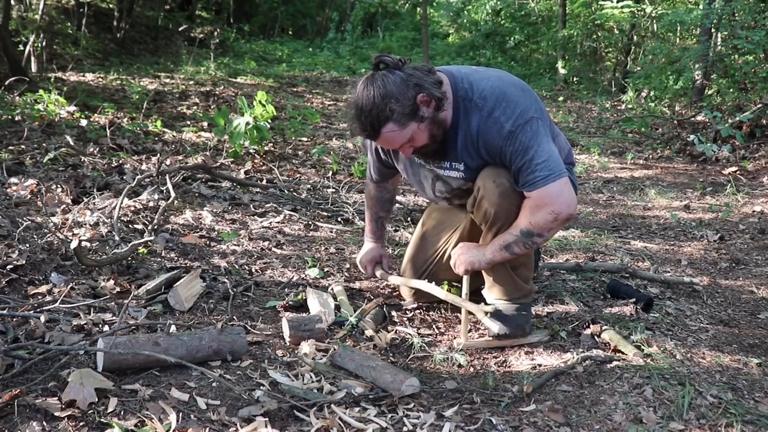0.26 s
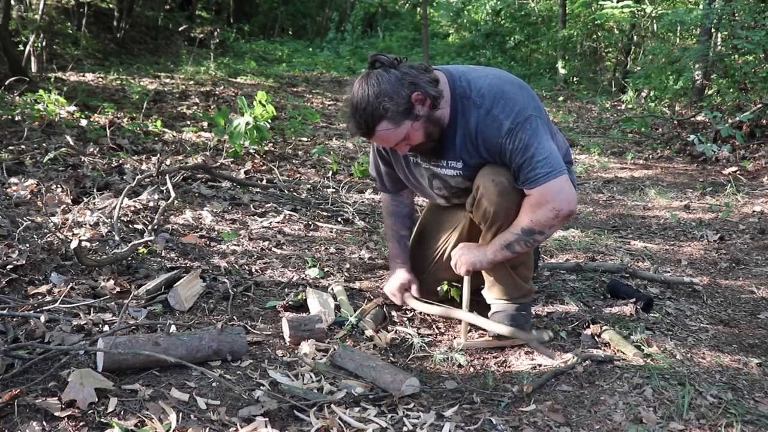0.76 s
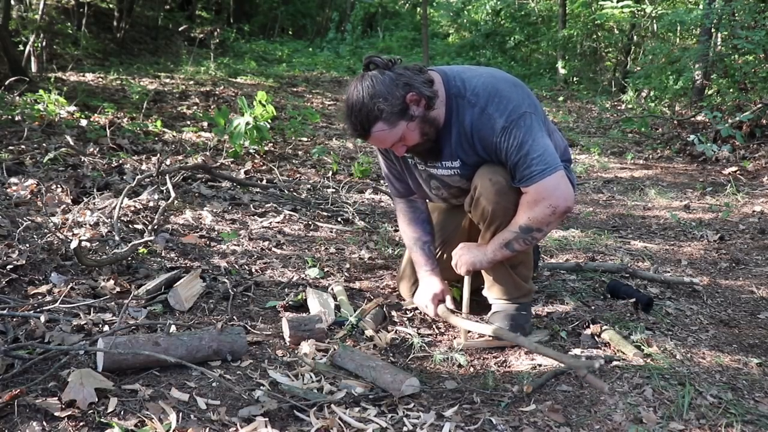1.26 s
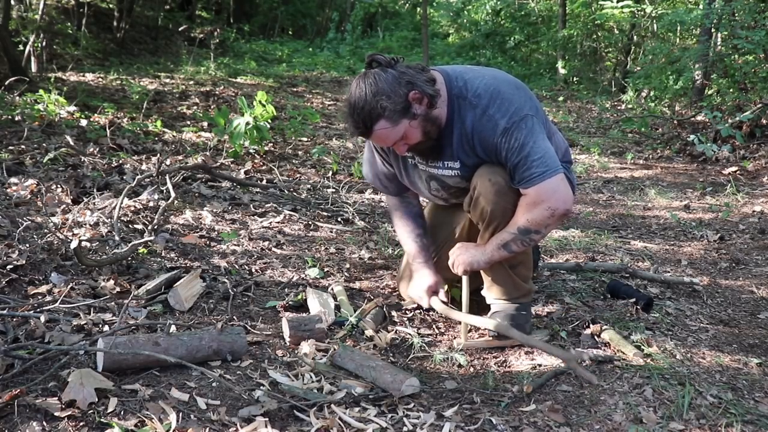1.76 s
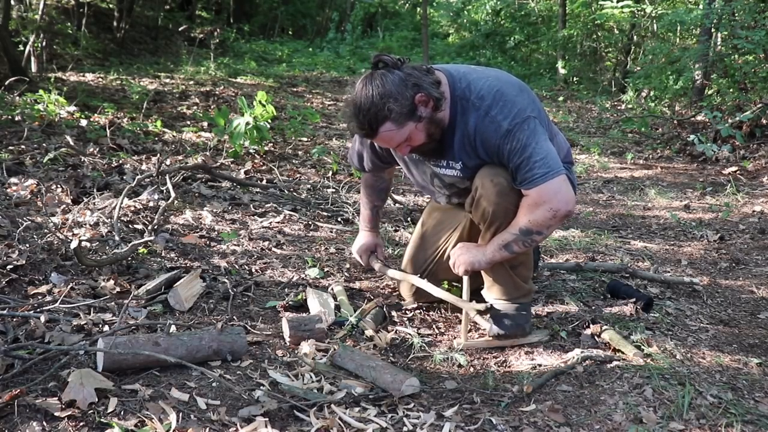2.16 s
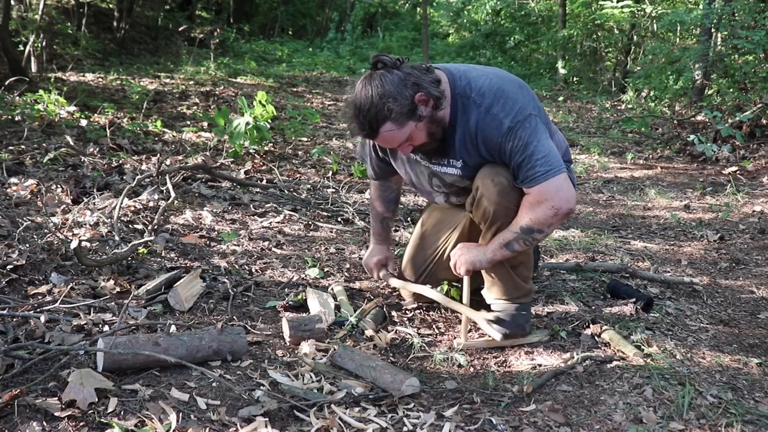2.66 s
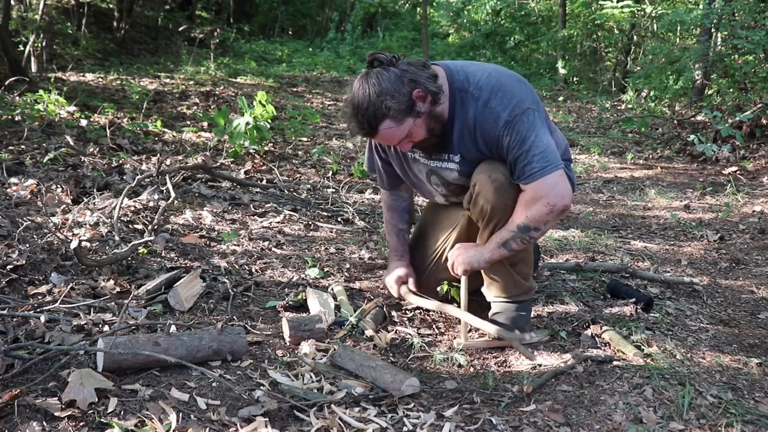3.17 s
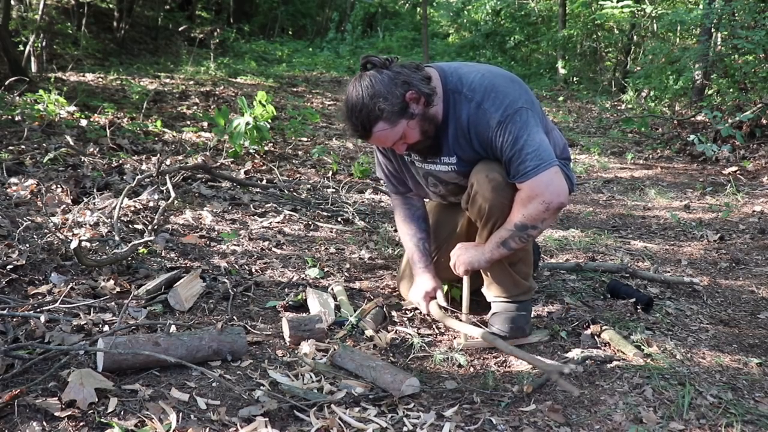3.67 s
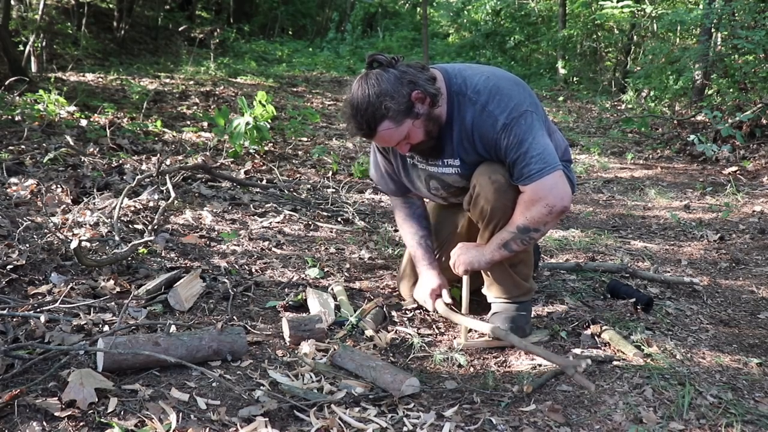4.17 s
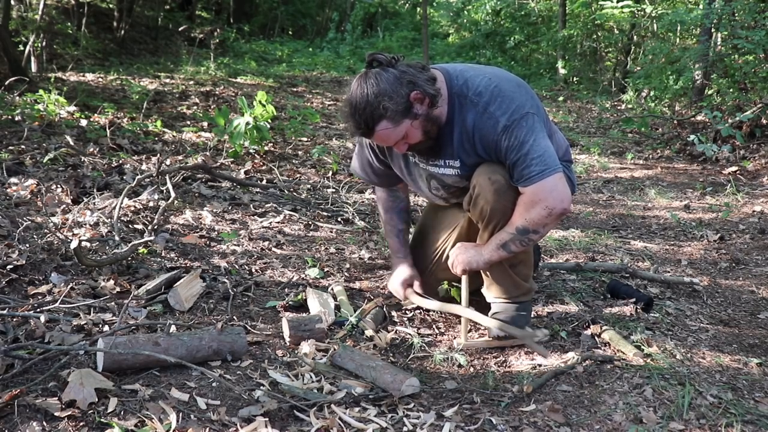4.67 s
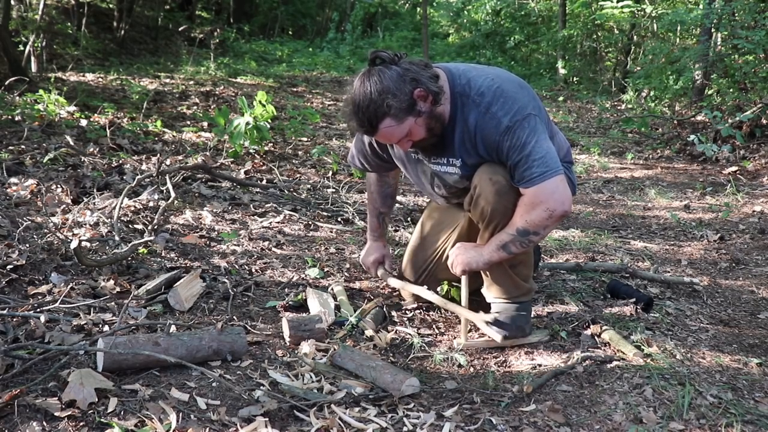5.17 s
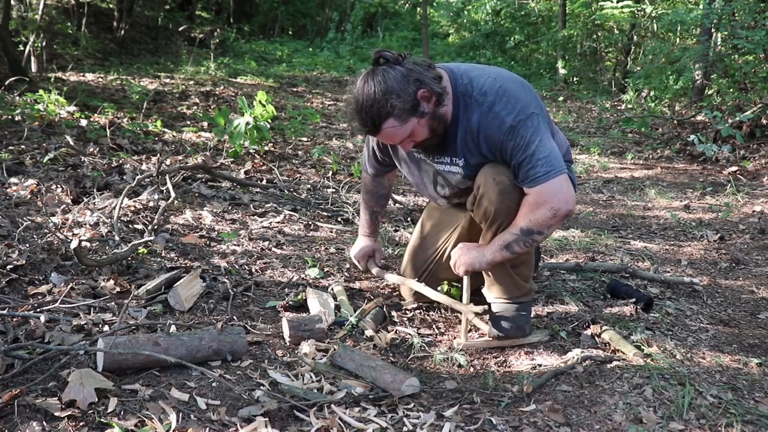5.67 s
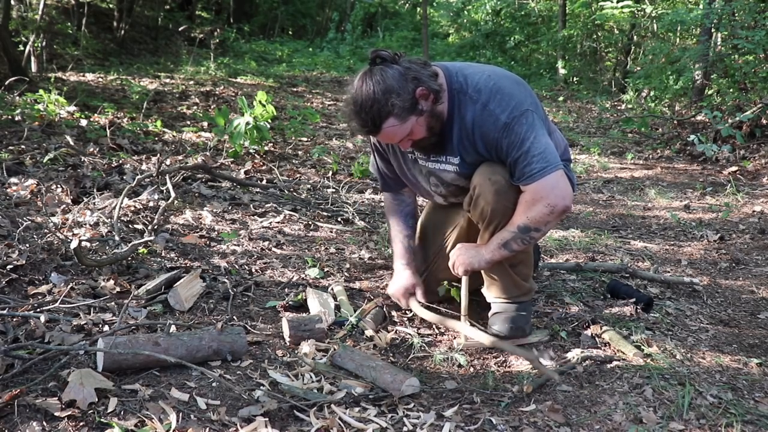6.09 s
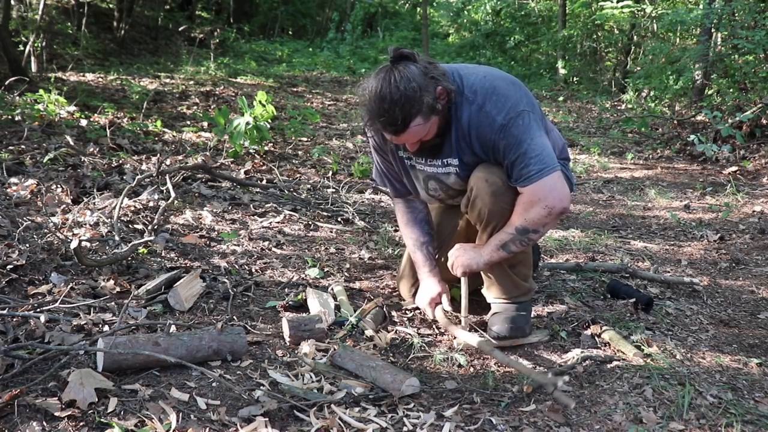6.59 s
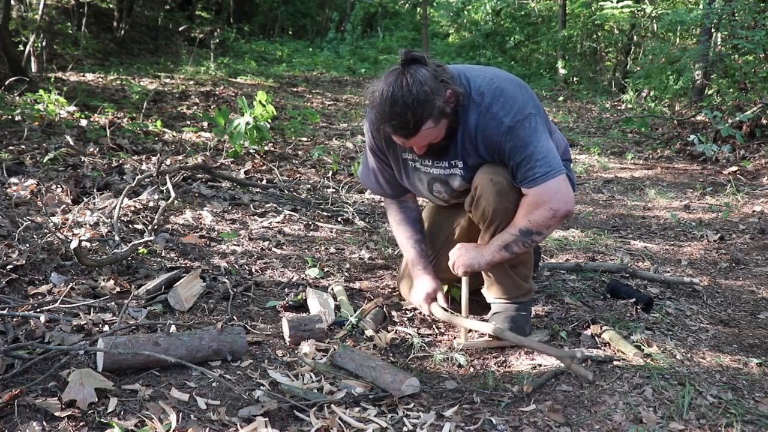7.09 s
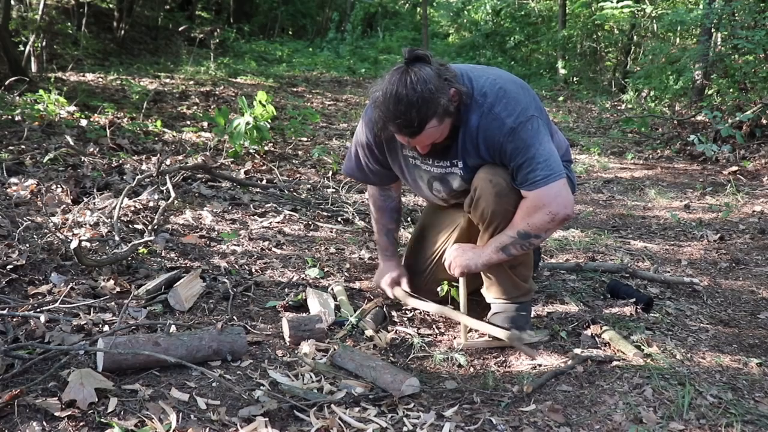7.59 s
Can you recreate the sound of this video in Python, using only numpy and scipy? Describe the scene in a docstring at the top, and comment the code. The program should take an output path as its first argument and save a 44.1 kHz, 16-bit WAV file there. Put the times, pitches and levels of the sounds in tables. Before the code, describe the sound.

From 0 to 7.8 seconds a wooden bow drill grinds without a break, about three alternating strokes a second, each roughly a quarter second. Hollow low-mid board grinding flutters with rapid knocks, about 36 a second at full speed. Push strokes carry a brighter gritty rasp with crackles; pulls are duller and swell more evenly. Sharp woody knocks and snaps stand out near 0.9, 2.1, 4.5, 5.1, 5.7 and 6.3. Early reversals have only faint cord scratches; from about 1.9, and strongly from 2.5 to 6.4, they bring scratchy chatter and tiny squeals around 3.6 kHz, some higher, notably a rising one at 6.06. Afterwards squeaks nearly vanish while dusty hiss grows. Close and dry, with thin dull echoes off trees, soft forest air, slowly growing deep rumble and a faint far hum, most noticeable near 2.7 and 7.4.

```python
"""A bow drill grinds away, about three strokes a second, on a forest floor.
The spindle rubs grains of noise through the resonances of spindle and hearth board, knocking once a turn.
Push strokes rasp and crackle with splintering snaps; pull strokes are duller.
Where the bow turns round, the cord slips in noise bursts that chatter, then in gliding tones that squeal.
Thin echoes off the trees, faint forest air and a far hum lie behind."""
import sys
import numpy as np
from scipy import signal
from scipy.fft import rfft, irfft, next_fast_len
from scipy.io import wavfile
from scipy.ndimage import uniform_filter1d

SR = 44100
rng = np.random.default_rng(int(sys.argv[2]) if len(sys.argv) > 2 else 0)


def put_to_file(sound):
    """Save the sound as 16-bit audio at rate SR, in the file named by the first command-line argument."""
    columns = np.atleast_2d(sound).T  # one column per channel
    safe = np.clip(columns, -1, 1)
    whole_steps = np.round(safe * 32767)
    wavfile.write(sys.argv[1], SR, whole_steps.astype(np.int16))


N = 345826
TIME = np.arange(N) / SR

# Bow strokes, push and pull in turn. Each row: start in seconds, length in seconds,
# relative grind level in dB, relative rasp level in dB.
BOW_STROKES = [(0.077, 0.276, -30.5, -37), (0.415, 0.236, -29, -43), (0.712, 0.256, -28.5, -35),
               (1.035, 0.246, -27.5, -42.0), (1.321, 0.245, -28, -35), (1.643, 0.239, -25, -38.5),
               (1.924, 0.257, -28, -32.5), (2.246, 0.247, -27.5, -38), (2.54, 0.248, -29.0, -33.5),
               (2.881, 0.158, -26.5, -40.0), (3.131, 0.211, -29, -35.5), (3.405, 0.285, -29.5, -41.5),
               (3.713, 0.255, -29.0, -36), (4.041, 0.214, -25.5, -39), (4.308, 0.254, -29.0, -37),
               (4.634, 0.203, -25.0, -40.5), (4.898, 0.25, -28, -31), (5.223, 0.188, -23.5, -37.0),
               (5.483, 0.27, -29, -32.5), (5.812, 0.2, -24.5, -38.5), (6.058, 0.266, -30, -35),
               (6.405, 0.198, -24, -38.0), (6.677, 0.24, -30, -37), (6.991, 0.211, -27.5, -39.5),
               (7.249, 0.25, -30.0, -36.5), (7.58, 0.21, -26, -38.5)]
# Hard knocks of the tip in its socket. Each row: time in seconds, relative level in dB.
SOCKET_KNOCKS = [(0.194, 2), (0.223, -2), (0.483, 9), (0.934, 19), (1.108, 12), (1.132, 4), (1.452, 5),
                 (2.031, 4), (2.324, 12), (2.658, 9), (2.93, -1), (2.956, 1), (3.514, 6), (3.546, 12),
                 (3.844, 2), (4.128, 6.5), (4.691, 16), (4.961, 7), (4.998, 3), (5.279, 14), (5.841, 8),
                 (5.874, 14), (5.9, 7), (6.47, 8), (6.547, 8), (6.815, 7), (7.664, -7)]
# Tone of the board under a push. Each row: frequency in Hz, relative level in dB.
PUSHED_BOARD = [(59, -38), (100, -23.5), (139, -6.5), (204, -9), (303, 1), (393, -2), (484, -15),
                (541, -10.5), (604, -6), (683, -2.5), (792, -6), (1250, -14), (1900, -17.5), (2470, -47),
                (4180, -120)]


def from_db(db):
    """Turn decibels into an amplitude factor."""
    return 10 ** (np.asarray(db) / 20)


def rms_one(x):
    """Scale a sound to unit RMS."""
    return x / np.sqrt(np.mean(x ** 2) + 1e-20)


def even(x, seconds):
    """Hold the running level at one, keeping all faster detail."""
    window = max(int(seconds * SR), 2)
    return x / np.sqrt(np.abs(uniform_filter1d(x ** 2, window)) + 1e-12)


def drift(per_s):
    """A smooth random wander of spread one: noise through two equal one-pole lowpasses."""
    r = np.exp(-2 * np.pi * per_s / SR)
    noise = rng.standard_normal(N + SR)
    return rms_one(signal.lfilter([1], [1, -2 * r, r * r], noise)[SR:])   # drop the settling second


def colour(x, spectrum, lag=0.):
    """Ring x through a causal body; bending waves arrive later the lower they are (lag: seconds at 300 Hz)."""
    size = 2 * next_fast_len(N)
    hz = np.arange(size // 2 + 1) * SR / size
    points, db = np.transpose(spectrum)
    level_db = np.interp(np.log(hz + 1), np.log(points), db)
    # folding the cepstrum makes the filter minimum-phase
    cepstrum = irfft(np.log(from_db(level_db)))
    cepstrum[1:size // 2] *= 2
    cepstrum[size // 2 + 1:] = 0
    bending = 4 * np.pi * lag * np.sqrt(300 * hz)
    response = np.exp(rfft(cepstrum) - 1j * bending)
    return irfft(rfft(x, size) * response)[:N]


def split(x, hz):
    """The parts below and above a frequency."""
    filters = [signal.butter(4, hz, kind, fs=SR, output="sos") for kind in ("low", "high")]
    return [signal.sosfilt(sos, x) for sos in filters]


def grains(per_s, spread_db):
    """Wood fibres break at random moments with uneven strength."""
    strength_db = spread_db * np.minimum(rng.exponential(1, N), 4)
    sizes = from_db(strength_db) * rng.choice([-1, 1], N)
    return sizes * (rng.random(N) < per_s / SR)


def ring(x, hz, width_hz):
    """One resonance of the wood, at unit power."""
    r = np.exp(-np.pi * width_hz / SR)
    poles = [1, -2 * r * np.cos(2 * np.pi * hz / SR), r * r]
    return rms_one(signal.lfilter([1, 0, -1], poles, x + 1e-18))


def spindle():
    """The tip grinds through charred dust and bears hardest on the socket wall once a turn."""
    # Wear of the socket as it fills with dust. Each row: time in seconds,
    # relative spindle ring level in dB, relative dust hiss level in dB.
    socket_wear = [(0, -1.5, -11.5), (2, 1, -8), (4, -3, -6.5), (5.3, -2, -10.5), (6.5, 0.5, -1),
                   (7.84, -6, 0.5)]
    # Tone of the scratching tip. Each row: frequency in Hz, relative level in dB.
    rasp_tone = [(880, -34.5), (1500, -6.5), (1620, -2.5), (1900, -9), (2140, 2), (2590, -4.5),
                 (2770, -5.5), (3120, -4), (3920, -10.5), (5440, -19.5), (6000, -18.5), (7690, -25),
                 (13400, -19.5), (15200, -25), (16000, -27)]
    # Tone of the hissing dust. Each row: frequency in Hz, relative level in dB.
    dust_tone = [(1500, -19), (3000, 0), (4900, 4), (6200, -2.5), (7100, -3.5), (8300, -8.5), (11500, -6),
                 (16000, -11)]
    speed, grind_gain, rasp_gain = bow()
    wear_s, ring_db, hiss_db = np.transpose(socket_wear)

    turns_per_s = 36   # nominal, at full speed
    angle = 2 * np.pi * np.cumsum(turns_per_s * speed) / SR
    # bend the angle so that the hard knocks fall on whole turns
    knock_s = np.array(SOCKET_KNOCKS)[:, 0]
    excess = np.unwrap(np.interp(knock_s, TIME, angle) % (2 * np.pi))
    angle -= np.interp(TIME, knock_s, excess)
    bearing = np.cos(angle)

    dust = grains(per_s=450 + 1000 * speed, spread_db=1.0) * from_db(1.6 * bearing)
    crumbs = grains(per_s=190, spread_db=0.5) * from_db(1.2 * bearing)
    # now and then a whole splinter crushes in a short tick of noise
    splinter_decay = np.exp(-1 / (0.00034 * SR))
    crushing = signal.lfilter([1], [1, -splinter_decay], grains(per_s=85, spread_db=8.0) + 1e-18)
    splinters = crushing * rng.standard_normal(N)
    friction = rms_one(dust) + 0.62 * rms_one(splinters) + 0.083 * rng.standard_normal(N)

    scratch = rms_one(colour(friction, rasp_tone))
    body = from_db(np.interp(TIME, wear_s, ring_db)) * spindle_ring(crumbs, spread_db=16)
    hiss = rms_one(colour(grains(per_s=2500, spread_db=3.5), dust_tone))
    hiss *= from_db(np.interp(TIME, wear_s, hiss_db))

    # the rasp stutters as a whole, and more as the spindle slows and starts to catch
    stutter_db, slow_stutter_db, stutter_per_s = 0.5, 6.5, 120
    stutter = from_db((stutter_db + slow_stutter_db * (1 - speed)) * drift(stutter_per_s))
    # dust builds up and clears in patches, so the layers flare separately
    layers = sum(layer * from_db(3.2 * drift(124)) for layer in (scratch, body, hiss))
    rasp = even(stutter * layers, seconds=0.072)
    return from_db(1.2) * hearth(angle) * grind_gain + from_db(1.5) * rasp * rasp_gain


def bow():
    """Relative speed, grind gain and rasp gain: each stroke has an attack, a hold and a release."""
    # a push gets up to speed, holds and brakes hard; a pull swells and fades evenly
    push_attack_s, push_release_s, pull_attack_s, pull_release_s = .11, .065, .13, .15
    # how far each sound falls for one unit of slack
    grind_fade_db, push_rasp_fade_db, pull_rasp_fade_db = 21.5, 22, 14.5
    # tilt of the rasp over a stroke: it leans up slightly in a push, down in a pull
    push_lean_db, pull_lean_db = 1, -4
    push = push_attack_s, push_release_s, push_rasp_fade_db, push_lean_db
    pull = pull_attack_s, pull_release_s, pull_rasp_fade_db, pull_lean_db
    speed, grind, rasp = np.zeros((3, N))
    for k, (start, length, grind_db, rasp_db) in enumerate(BOW_STROKES):
        attack, release, rasp_fade_db, lean_db = pull if k % 2 else push
        near = np.abs(TIME - start - length / 2) < length
        age = TIME[near] - start
        # none at full speed, about one at the ends of the stroke
        slack = np.maximum(1 - age / attack, 0) ** 2
        slack += np.maximum(1 - (length - age) / release, 0) ** 2
        slack -= slack.min()
        speed[near] = np.maximum(speed[near], 1 - slack / 2)
        grind[near] = np.hypot(grind[near], from_db(grind_db - grind_fade_db * slack))
        tilt_db = lean_db * (age / length - .5)
        rasp[near] = np.hypot(rasp[near], from_db(rasp_db - rasp_fade_db * slack + tilt_db))
    return speed, grind, rasp


def hearth(angle, knock_s=0.0024, lag=.007):
    """Low grinding and knocks in the board, which rings differently as the bow leans on it either way."""
    # Tone of the board under a pull. Each row: frequency in Hz, relative level in dB.
    pulled_board = [(59, -48), (100, -31), (150, -10.5), (199, -23.5), (225, -12.5), (307, 0.5),
                    (466, -17.5), (534, -18.5), (643, -6.5), (718, -6.5), (965, -11.5), (1250, -19.5),
                    (1620, -18.5), (1900, -28.5), (2470, -51), (4180, -120)]
    knocks, t = np.zeros(N), np.arange(int(0.0051 * SR)) / SR
    whole_turns = angle[:-len(t)] // (2 * np.pi)
    turns = TIME[np.flatnonzero(np.diff(whole_turns) > 0)]
    light = [(s, -2) for s in turns]   # besides the hard ones, each turn knocks lightly
    for s, db in list(SOCKET_KNOCKS) + light:
        knocks[int(s * SR) + np.arange(len(t))] += from_db(db - 1.5) * np.exp(-t / knock_s)
    grinding = rms_one(grains(per_s=3000, spread_db=2.5) * from_db(3.1 * np.cos(angle)))
    drive = grinding + knocks * rng.standard_normal(N)
    push, pull = [even(colour(drive, board, lag), seconds=0.056) for board in (PUSHED_BOARD, pulled_board)]
    # the lean changes side shortly before each stroke
    pushing = np.searchsorted([stroke[0] - .03 for stroke in BOW_STROKES], TIME) % 2 == 1
    lean = uniform_filter1d(pushing.astype(float), size=500)
    return lean * push + (1 - lean) * pull


def spindle_ring(clicks, spread_db):
    """Every click reaches each spindle mode with a strength of its own."""
    # Resonances of the spindle. Each row: frequency in Hz, width in Hz, relative level in dB.
    spindle_modes = [(1742, 65, -7.5), (2138, 81, 4.5), (2563, 38, -0.5), (3135, 49, -4.5),
                     (3740, 250, -23), (4660, 100, -6), (4890, 140, -8.5), (5650, 160, -14),
                     (5920, 440, -3.5)]
    total = np.zeros(N)
    for hz, width, db in spindle_modes:
        strength = from_db(spread_db * rng.uniform(-1.06, 1, N))
        total += from_db(db) * ring(clicks * strength, hz, width)
    return rms_one(total)


def chatter(slips_per_s=235, slip_s=0.0024, rise_s=0.00027, tail_s=0.0022):
    """The cord sticks and slips in quick scratchy bursts that last longer when it pulls harder."""
    # Slips of the cord as the bow brakes and sets off again. Each row: start in seconds,
    # length in seconds, relative level in dB, top octave against the rest in dB.
    cord_slips = [(0.671, 0.0014, -38, 2), (0.681, 0.011, -43, -18), (0.984, 0.016, -32.5, -12),
                  (1.292, 0.0092, -40, -8), (1.592, 0.0038, -43, 2), (1.876, 0.0048, -31.5, 0),
                  (1.897, 0.0074, -30, 0), (2.473, 0.012, -27, -2.5), (2.501, 0.033, -23, 7),
                  (2.782, 0.0045, -33.5, 1), (2.807, 0.022, -28.5, 0), (3.07, 0.012, -24, 8),
                  (3.095, 0.0053, -35, -2), (3.102, 0.0097, -26, 6), (3.347, .015, -24, 1),
                  (3.379, 0.023, -23.5, 0), (3.651, 0.014, -21.5, 6.5), (3.682, 0.011, -17.5, 9),
                  (3.968, 0.0027, -37.5, -1), (3.987, 0.0056, -42.5, -6), (4.252, 0.011, -27.5, -1),
                  (4.275, .028, -28, 5), (4.555, .003, -35.5, -2), (4.573, 0.017, -25, 1),
                  (4.847, 0.015, -27, 5), (4.873, 0.018, -22.5, 8), (5.154, 0.0042, -35, 0),
                  (5.171, .002, -40, -7), (5.422, 0.015, -29.5, 20), (5.436, 0.0091, -23.5, 3),
                  (5.456, 0.0046, -31, -15), (5.461, .012, -22, 8), (5.741, 0.0024, -34, 6),
                  (5.76, 0.0047, -30.5, 0), (6.013, .02, -23, 3.5), (6.046, 0.015, -25.5, -0.5),
                  (6.344, 0.037, -31.5, -4), (6.379, 0.015, -20.5, 3), (6.613, 0.0024, -39, 1),
                  (6.647, 0.026, -29, 0), (6.938, 0.0079, -38.5, 0), (7.232, 0.017, -30, 4.5),
                  (7.518, .005, -39, 2), (7.824, 0.0074, -32.5, 7)]
    # Tone of the scratching cord. Each row: frequency in Hz, relative level in dB.
    cord_tone = [(290, -41), (500, -2), (750, -19), (1480, 0), (2610, -25), (3440, 6.5), (4340, -6),
                 (5630, 9), (6420, -4), (8700, -11), (10100, 2.5), (11100, -6.5), (12500, 2.5),
                 (15100, 1.5), (16000, -7.5)]
    # Resonances of the shaft where the cord grips it. Each row: frequency in Hz,
    # width in Hz, relative level in dB.
    shaft_modes = [(1090, 38, -20.5), (1536, 170, -17), (2580, 200, -17), (3550, 690, -6), (5730, 240, -11),
                   (7180, 260, -13.5), (10550, 350, -14), (12200, 1300, -11)]
    jolt_db = -44.5   # every slip jolts the board equally, light or hard
    out = np.zeros(N)
    scratch = rms_one(colour(rng.standard_normal(N), cord_tone))
    # the scratch sings in the shaft's modes, each swelling on its own as the grip shifts
    for hz, width, db in shaft_modes:
        scratch += from_db(db + 5.1 * drift(61)) * ring(rng.standard_normal(N), hz, width)
    board = rms_one(colour(rng.standard_normal(N), PUSHED_BOARD))
    body, top = [even(part, seconds=0.0028) for part in split(scratch, hz=8700)]
    chances = rng.standard_normal((len(cord_slips), 2, 16))
    for (start, lasts, db, top_db), chance in zip(cord_slips, chances):
        t = np.arange(int((lasts + 0.0025) * SR)) / SR
        gaps = np.exp(0.2 * chance[0]) / slips_per_s
        slip_starts = np.cumsum(gaps) - gaps[0]
        age = np.maximum(t - slip_starts[:, None], 0)
        length = slip_s * from_db(0.35 * max(db + 32, 0))
        shapes = (1 - np.exp(-age / rise_s)) * np.exp(-age / length)
        bursts = from_db(2.34 * chance[1]) @ shapes
        bursts *= np.exp(-np.maximum(t - lasts, 0) / tail_s)
        at = np.minimum(int(start * SR) + np.arange(len(t)), N - 1)
        sound = bursts * (body[at] + from_db(top_db) * top[at])
        # the wave runs back along the cord after a time that depends on where it grips
        back = int(.0007 * np.exp(.35 * chance[0, -1]) * SR)
        sound = sound + 0.73 * np.pad(sound, (back, 0))[:len(t)]
        slip = from_db(db) * rms_one(sound) * np.sqrt(t[-1] / lasts)
        jolt = from_db(jolt_db) * rms_one(bursts) * board[at]
        out[at] += slip + jolt
    return out


def squeals(waver=0.024, rough=0.099, flutter_db=3.0, edge_s=0.0055, sink_db=4, purify_db=14):
    """The slips lock into a tone: rough and rich at first, then purer as it settles and fades."""
    # Squeals of the cord. Each row: start in seconds, length in seconds, pitch the glide departs
    # from in Hz (overshot at the onset), last pitch in Hz, level in dB, relative overtone level in dB.
    cord_squeals = [(1.9, .024, 3520, 3600, -35, -20), (2.531, 0.017, 3630, 3650, -30, -2),
                    (2.811, 0.02, 3440, 3550, -26, -14), (2.833, 0.022, 3390, 3670, -24.5, -7),
                    (3.107, 0.024, 3610, 3650, -29, -5), (3.397, .036, 3560, 3680, -29, -6),
                    (3.641, 0.017, 3550, 3550, -22.5, -10), (3.695, 0.019, 3420, 3610, -21.5, -6),
                    (3.988, 0.024, 3600, 3650, -33, -22), (4.286, 0.033, 5500, 5670, -23.5, -4.5),
                    (4.585, .028, 3420, 3770, -24.5, -3), (4.842, 0.0073, 5460, 4840, -28, -7),
                    (4.878, 0.029, 3550, 3735, -27, -10), (5.169, 0.029, 3623, 3667, -32, -16),
                    (5.468, 0.023, 4500, 4030, -21.5, -7.5), (5.764, .03, 3610, 3624, -20.5, -13),
                    (6.057, 0.035, 5520, 6780, -19, -6), (6.388, 0.02, 3450, 3590, -31.5, -1),
                    (7.243, 0.0034, 3490, 3470, -30.5, -5.5)]
    overtone_step_db = -3.5   # each overtone against the one below it
    out, slow, fast, flutter = np.zeros(N), drift(165), drift(1030), drift(91)
    jolts = 1.1 * grains(per_s=240, spread_db=-3.0)
    for start, length, first_hz, last_hz, db, rich_db in cord_squeals:
        at = np.arange(int((start - edge_s / 2) * SR), int((start + length + edge_s) * SR))
        u = np.linspace(0, 1, len(at))
        force = from_db(min(rich_db / 2, 0))   # hard slips are rich and unsteady
        hz = last_hz + (first_hz - last_hz) * 2.4 * (1 - u) ** 1.9
        wobble = force * (1 - u) * (waver * slow[at] + rough * fast[at])
        phase = 2 * np.pi * np.cumsum(hz * (1 + wobble)) / SR
        phase += force * np.cumsum(jolts[at] * (1 - u))   # the cord catches anew, breaking the tone
        overtones = np.zeros(len(at))
        for k in (2, 3, 4):
            level_db = rich_db + overtone_step_db * (k - 2)
            own_flutter = np.roll(flutter, k * SR)[at]
            audible = k * hz < SR / 2
            overtones += from_db(level_db + 4.1 * own_flutter) * np.sin(k * phase) * audible
        tone = np.sin(phase) + from_db(purify_db * (0.29 - u ** 2)) * overtones
        arch = np.abs(np.sin(np.pi * u)) ** 1.15
        swell = rms_one(arch * from_db(flutter_db * force * flutter[at] - sink_db * u))
        out[at] += from_db(db) * tone * swell
    # the spindle rings on briefly
    return out + from_db(-13.5) * np.std(out) * ring(out, hz=3610, width_hz=28)


def snaps(decay_s=0.0025):
    """The spindle catches and snaps free: a short splintering burst that rings in spindle and board."""
    # Snaps during the pushes. Each row: time in seconds, relative level in dB,
    # relative top octave level in dB.
    snap_events = [(0.2747, -15.5, -29), (0.3207, -22, -20), (0.3378, -17, -39), (0.9369, -9, -7.5),
                   (1.528, -14, -9), (2.043, -13.5, -10), (2.1086, -16, -7), (2.158, -16.5, -6),
                   (2.7422, -24, -29), (3.248, -18, -11), (4.5137, -14, -23), (4.5244, -16.5, -18),
                   (4.9911, -23, -12), (5.0235, -19, -24), (5.0978, -9.5, -3), (5.1069, -10.5, -7),
                   (5.53, -15.5, -17), (5.6594, -11.5, -12), (5.6754, -10.5, -11), (6.273, -14.5, -6),
                   (6.2907, -16, -11), (6.8314, -14, -36), (7.4724, -17, -39)]
    # Tone of a snap. Each row: frequency in Hz, relative level in dB.
    snap_tone = [(350, -44), (600, 18), (1570, -11.5), (2090, 9), (2990, 0.5), (5480, -2), (6030, -2.5),
                 (6640, -11.5), (12300, -18), (13400, -17), (16000, -27)]
    low, high = np.zeros((2, N))
    t = np.arange(int(0.02 * SR)) / SR
    noises = rng.standard_normal((len(snap_events), len(t)))
    for (s, db, top_db), noise in zip(snap_events, noises):
        at = int(s * SR) + np.arange(len(t))
        burst = from_db(db + 0.5) * noise * np.exp(-t / decay_s)
        low[at] += burst
        high[at] += burst * from_db(top_db + 16.0)
    body = split(colour(low, snap_tone), hz=8500)[0]
    top = split(colour(high, snap_tone), hz=8500)[1]
    return body + top


def trees(x, t60=0.22, echo_db=-22, dull_hz=7000):
    """Trunks and leaves scatter back a thin, dull tail."""
    echoes = grains(per_s=1700, spread_db=1) * from_db(-60 * TIME / t60)
    echoes = (echoes * (TIME > .008))[:SR]   # the first echo takes 8 ms or more
    tail = signal.fftconvolve(x, echoes / np.linalg.norm(echoes))[:N]
    lowpass = signal.butter(1, dull_hz, fs=SR, output="sos")
    return from_db(echo_db) * signal.sosfilt(lowpass, tail)


def air():
    """Soft forest hiss over a deep rumble, both coloured noise."""
    # Tone of the forest hiss. Each row: frequency in Hz, relative level in dB.
    forest_tone = [(41, -39), (70, -12), (244, -15), (506, -13), (579, -23), (1280, -23.5), (1980, -37),
                   (4090, -29), (5250, -32), (5620, -26), (6300, -34), (14600, -36), (16000, -43)]
    # Tone of the rumble. Each row: frequency in Hz, relative level in dB.
    rumble_tone = [(10, -29), (24, -10), (33, 3.5), (42, -9), (60, -15), (90, -42), (200, -44)]
    hiss_db = -47
    # the low rumble wanders and slowly grows
    rumble_db, rise_db_per_s, wander_db = -50.5, 1.14, 0.9
    hiss = from_db(hiss_db) * rms_one(colour(rng.standard_normal(N), forest_tone))
    rumble = even(colour(rng.standard_normal(N), rumble_tone), seconds=0.2)
    return hiss + rumble * from_db(rumble_db + rise_db_per_s * TIME + wander_db * drift(0.91))


def hum():
    """A faint far hum, one sine, comes and goes, wavering a little."""
    # Course of the hum. Each row: time in seconds, centre pitch in Hz, level in dB.
    hum_course = [(0, 465, -63), (2.7, 471.6, -52.5), (4, 465.5, -62), (6.9, 493, -86), (7.45, 510, -44),
                  (7.84, 496, -74)]
    s, hz, db = np.transpose(hum_course)
    pitch = np.interp(TIME, s, hz) * (1 + 0.0088 * drift(4.12))
    phase = 2 * np.pi * np.cumsum(pitch) / SR
    return np.sqrt(2) * from_db(np.interp(TIME, s, db)) * np.sin(phase)


def scene():
    """Spindle, cord and snaps among the trees, over the forest air and the hum."""
    drill = spindle() + from_db(2.0) * chatter() + squeals() + snaps()
    return (drill + trees(drill) + air() + hum())[None]


def record(dry):
    """The tallest peaks are rounded and the top is cut steeply."""
    rounded = 0.53 * np.tanh(dry / .55)
    cutoff_hz = 15900
    lowpass = signal.ellip(10, .2, 70, cutoff_hz, fs=SR, output="sos")
    return signal.sosfilt(lowpass, rounded)


dry = scene()
out = record(dry)
put_to_file(out)
```